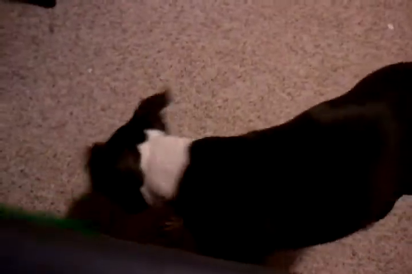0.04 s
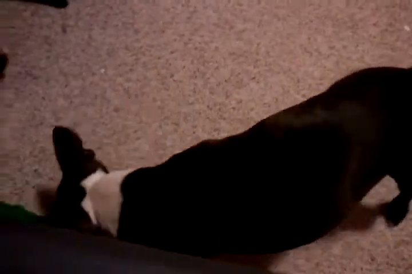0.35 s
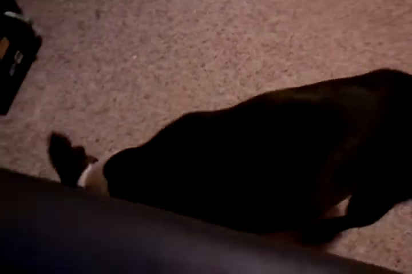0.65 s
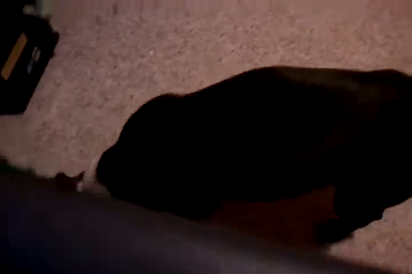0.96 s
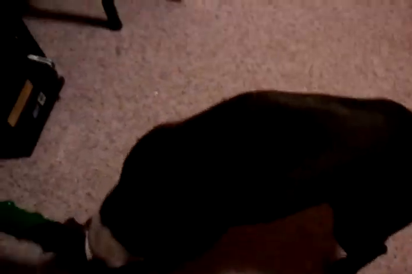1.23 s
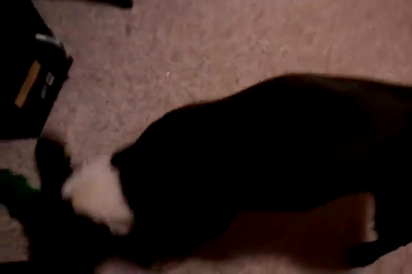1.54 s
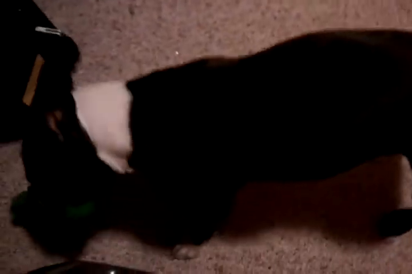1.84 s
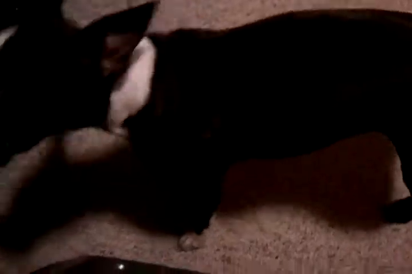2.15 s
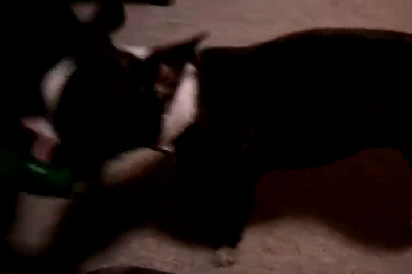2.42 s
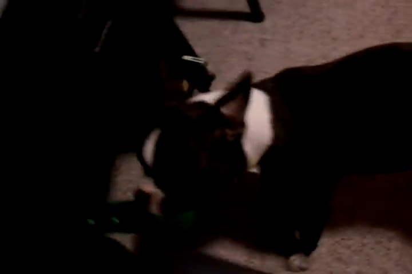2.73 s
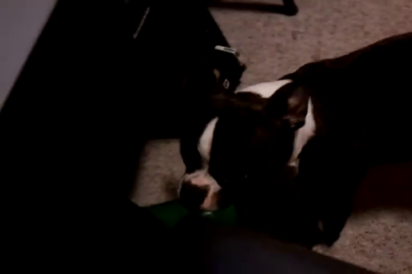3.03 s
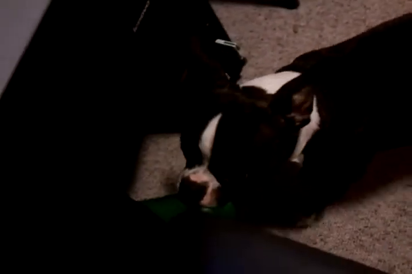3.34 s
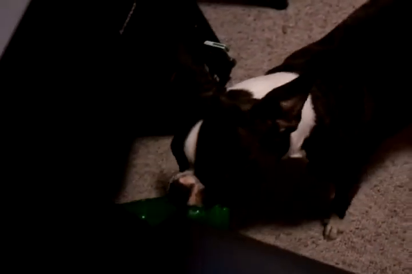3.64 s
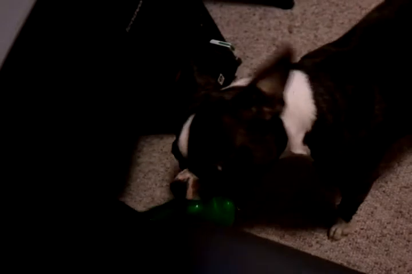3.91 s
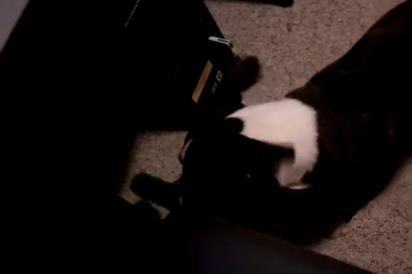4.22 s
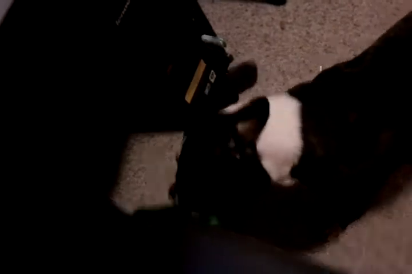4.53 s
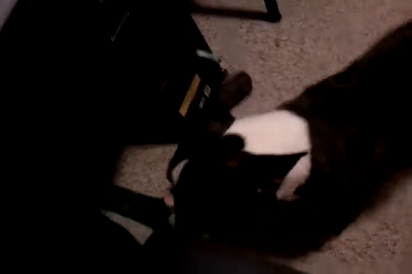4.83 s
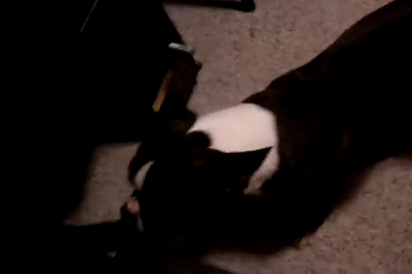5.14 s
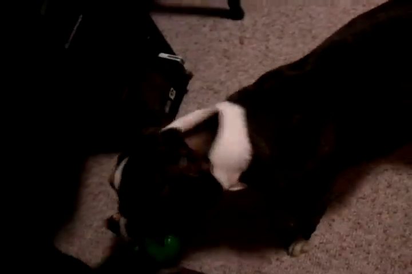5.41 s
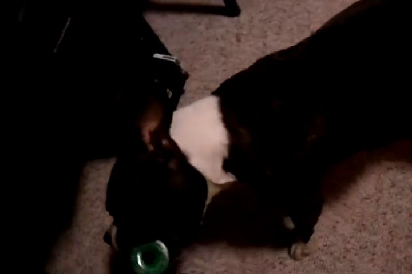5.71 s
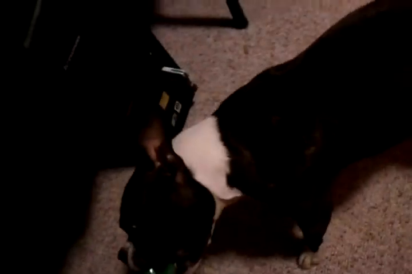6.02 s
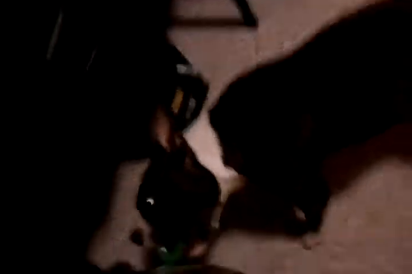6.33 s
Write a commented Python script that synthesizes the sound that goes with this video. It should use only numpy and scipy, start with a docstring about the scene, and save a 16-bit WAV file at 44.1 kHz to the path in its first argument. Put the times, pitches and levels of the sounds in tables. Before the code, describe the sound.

A puppy plays with a rubber squeaky toy on the carpet of a small room. It opens with a flurry of dull bumps and scuffs from paws and toy, followed by a few tiny tooth clicks and brushing fur. Five short, high squeaks come at uneven intervals, the first one fainter. A sharp tooth click and light shuffling finish it. Everything sounds close, over a faint steady hiss.

```python
"""A rubber squeaky toy sounds five times as a puppy bites it, on a carpet in a small room.
Each bite drives air through a reed, whose pitch rises and falls with the pressure.
Between bites, paws and toy bump and scuff on the floor and teeth tick on the rubber.
Fur brushes the furniture and air seeps out of the toy and back in, over a faint steady hiss."""
import sys
import numpy as np
from scipy import signal
from scipy.fft import rfft, irfft
from scipy.io import wavfile

SR = 44100
rng = np.random.default_rng(int(sys.argv[2]) if len(sys.argv) > 2 else 0)


def wav_record(signal):
    """Record a signal, one row per channel, as 16-bit PCM in the file named by sys.argv[1]."""
    frames = np.transpose(np.atleast_2d(signal))
    bounded = np.clip(frames, -1, 1)
    # unit amplitude maps onto the largest positive 16-bit level
    quanta = np.round(bounded * 32767).astype(np.int16)
    wavfile.write(sys.argv[1], SR, quanta)


N = 280689
T = np.arange(N) / SR

# paws and toy landing on the carpet: (time [s], level [dB], contact time [ms])
LANDINGS = [(0.023, -35, 0.31), (0.037, -17.5, 2.34), (0.072, -26.5, 2.9), (0.128, -24, 2.54),
            (0.391, -29.5, 1.23), (0.429, -16.5, 1.25), (0.444, -25.5, 1.8), (0.508, -32, 3.2),
            (0.521, -28, 0.56), (0.753, -40, 1.9), (0.777, -42.5, 0.7), (1.073, -40.5, 1.04),
            (1.645, -45, 4.8), (1.773, -43, 2.5), (1.918, -41, 2.9), (2.165, -44.5, 2.9), (3.204, -47, 3.6),
            (3.457, -45.5, 3.6), (3.826, -50.5, 1.8), (5.607, -43, 0.72), (5.632, -48, 0.28),
            (5.776, -45.5, 1.52), (5.921, -35, 2.7), (5.946, -40.5, 0.71)]


def squeaks(attack_s=0.0051, release_s=0.017, squeeze_db_per_hz=0.0336, full_tone_hz=1040):
    """Source and filter: a reed chops the airflow into harmonics that sweep through tube resonances."""
    # bites: (time [s], length [s], pitch [Hz], pitch lift at the hardest squeeze [Hz],
    # time to that squeeze [s], its half length [s], level [dB], fade [dB/s])
    bites = [(1.451, 0.072, 1129, 60, 0.0033, .018, -34, -28),
             (2.6695, 0.12, 1112, 66.2, 0.045, 0.049, -21.5, 9.5),
             (3.771, 0.16, 1125, 155, .0495, .036, -24.5, 8.5),
             (4.149, .125, 1105, 19.9, 0.0638, 0.013, -23.5, 25),
             (4.931, 0.067, 1057, 9.2, 0.013, 0.007, -22.5, 114)]
    # the reed as the jaws shade it, per bite: (level of each of harmonics 1 to 7 [dB])
    spectra = [(-5.5, 0.5, -0.5, -6.5, -1.5, -10.5, -31), (-12.5, -7.5, -11, -8.5, -1, -10, -36),
               (-7.5, -3, -7.5, -3.5, -0.5, -11, -28), (-9.5, -2.5, -7.5, -9, -2.5, -7.5, -22),
               (-14.5, -2.5, -7.5, -11, -14, -8, -21.5)]
    # two near reflections per bite: (delay [ms], gain [ratio], delay [ms], gain [ratio])
    reflections = [(1.04, 0.48, 4.95, 0.22), (2.81, 0.39, 2.0, 0.44), (1.08, 0.42, 3.1, 0.15),
                   (1.96, 0.5, 6.74, 0.13), (5.13, 0.13, 0.85, 0.49)]
    # unsteadiness of the reed, per bite: (pitch jitter [ratio], air level [dB])
    rasps = [(.011, -20), (0.00092, -25), (0.0025, -20), (0.0011, -22), (0.0014, -27)]
    # resonances of the reed's tube: (frequency [Hz], width [Hz], boost [dB])
    tube = [(2455, 140, 10), (4609, 35, 8), (4808, 135, 16)]
    # spectrum of the rushing air: (frequency [Hz], level [dB])
    air_colour = [(40, -34.5), (100, -23.5), (300, -12.5), (750, -1), (1500, -14), (2400, -7.5),
                  (3200, -10.5), (5200, -1.5), (6800, 3.5), (8000, -3.5)]
    start_flat_hz, start_s, sag_hz_per_s = 125, 0.0033, 144
    end_flat_hz, end_s, end_jitter = 190, 0.0139, 0.0209
    out = np.zeros(N)
    wobble, flutter_db = walk(700), 1.5 * walk(300)
    air = colour(rng.standard_normal(N), air_colour)
    for bite, harmonics, echoes, (jitter, air_db) in zip(bites, spectra, reflections, rasps):
        s, length, reed_hz, lift_hz, crest, half, db, fade = bite
        t = T[:int(length * SR)]
        span = int(s * SR) + np.arange(len(t))
        squeeze_hz = lift_hz * np.exp(-((t - crest) / half) ** 2)
        # the reed comes up to pitch, sags as the toy empties, then drops raggedly as the air runs out
        spent = np.exp((t - length) / end_s)
        flat_hz = start_flat_hz * np.exp(-t / start_s) + sag_hz_per_s * t + end_flat_hz * spent
        hz = (reed_hz + squeeze_hz - flat_hz) * (1 + (jitter + end_jitter * spent) * wobble[span])
        phase = 2 * np.pi * np.cumsum(hz) / SR
        dull_db = 50 * np.maximum(1 - hz / full_tone_hz, 0)  # a weakly blown reed loses its edge
        reed = undb(air_db) * air[span] * (1 + np.cos(phase))  # air hisses while the reed is open
        for k, harmonic_db in enumerate(harmonics, 1):
            tube_db = sum(boost / (1 + (2 * (k * hz - f) / width) ** 2) for f, width, boost in tube)
            reed += undb(harmonic_db + tube_db - dull_db * (k - 2)) * np.sin(k * phase)
        # loudness follows the squeeze until the jaws let go
        gate = np.minimum(np.minimum(t / attack_s, (length - t) / release_s), 1)
        reed *= gate * undb(db + squeeze_db_per_hz * squeeze_hz - fade * t + flutter_db[span])
        add(out, s, reed)
        for ms, gain in np.reshape(echoes, (-1, 2)):
            add(out, s + ms / 1000, gain * reed)
    return out


def peeps(jitter=0.024):
    """Near its threshold of oscillation the reed gives only a faint, unsteady fundamental."""
    # light squeezes: (peak time [s], pitch [Hz], level [dB], half length [s])
    squeezes = [(3.575, 790, -58.5, 0.016), (3.614, 1186, -58.5, 0.016), (5.947, 1123, -44.5, 0.0043),
                (6.199, 1130, -53, 0.0072)]
    out = np.zeros(N)
    wobble = 1 + jitter * walk(400)
    for s, hz, db, half in squeezes:
        envelope = undb(db) * np.exp(-((T - s) / half) ** 2)
        out += envelope * np.sin(2 * np.pi * np.cumsum(hz * wobble) / SR)
    return out


def bumps(landings, detune=0.041, lowest_hz=100):
    """Impact excitation: a soft push rings the floor's modes; longer contact gives a duller bump."""
    # modes of the floor: (frequency [Hz], level [dB], t60 [s])
    floor_modes = [(112, -24.5, 0.11), (229.6, -12, 0.068), (298, -4, 0.048), (370.5, -2, 0.04),
                   (479, -2.5, 0.05), (565, -2, 0.062), (671, 0, 0.051), (870, -9, 0.087), (1081, -4, 0.11),
                   (1830, 7, 0.028), (2040, -3, 0.018), (2500, -7, 0.056)]
    out, t = np.zeros(N), T[:SR // 5]
    hz, db, t60 = np.transpose(floor_modes)[:, :, None]
    places = rng.standard_normal((len(landings), 2, len(floor_modes), 1))
    for (s, peak_db, contact_ms), (shift, swing) in zip(landings, places):
        # the point of impact decides which way each mode swings
        modes = np.sign(swing) * np.sin(2 * np.pi * hz * (1 + detune * shift) * t)
        ring = (modes * undb(db) * decay(t, t60)).sum(0)
        push = np.hanning(int(contact_ms * SR / 1000))
        bump = band(signal.fftconvolve(ring, push), lowest_hz, "high")
        add(out, s, undb(peak_db) * bump / abs(bump).max())
    return out


def steps(per_s=24, contact_ms=3.5, spread_db=8.5):
    """An irregular impact train: light landings as the puppy shifts its feet."""
    # spells of shuffling: (start [s], end [s], level [dB])
    shuffles = [(0.058, .16, -37), (0.424, .56, -42), (3.033, 3.1, -53.5), (5.622, 5.8, -56),
                (5.939, 6.02, -46)]
    landings = []
    for start, end, db in shuffles:
        slots = np.arange(start, end, 1 / per_s)
        for s, (late, size) in zip(slots, rng.random((20, 2))):
            landings.append((s + late / per_s, db + spread_db * (2 * size - 1), contact_ms))
    return landings


def ticks(rise_s=0.00013, tube_hz=4850, tube_db=-21.5, tube_t60=0.013, lowest_hz=3200):
    """Damped free vibration: each slip of a tooth rings briefly and faintly excites the toy's tube."""
    # teeth slipping off wet rubber: (time [s], level [dB], frequency [Hz], t60 [ms])
    slips = [(1.1101, -23.5, 6200, 2.3), (1.1288, -21.5, 5450, 2.8), (1.1912, -27, 4600, 0.83),
             (2.3431, -33.5, 5130, 1.3), (4.6867, -39.5, 5680, 4.1), (5.1577, -11, 5700, 1.03),
             (5.1873, -34, 4970, 3.3), (5.2193, -37.5, 5600, 2), (5.8600, -38, 4620, 11)]
    out, t = np.zeros(N), T[:SR // 40]
    onset = 1 - np.exp(-(t / rise_s) ** 2)
    tube = undb(tube_db) * onset * decay(t, tube_t60) * np.sin(2 * np.pi * tube_hz * t)
    for s, db, hz, t60_ms in slips:
        envelope = onset * decay(t, t60_ms / 1000)
        ring = envelope / envelope.max() * np.sin(2 * np.pi * hz * t)
        add(out, s, undb(db) * (ring + tube))
    return band(out, lowest_hz, "high")


def scuffs(split_hz=3200, rise_share=0.72):
    """Friction noise: carpet fibres slip in short swells, during drags and under landings."""
    # toy or claw dragged over the pile: (peak time [s], level [dB], length [s], treble tilt [dB])
    drags = [(0.004, -27.5, .02, -6), (0.028, -17, 0.0093, 5.5), (0.126, -35.5, 0.0061, 3),
             (0.176, -54.5, 0.038, 16), (0.339, -45, 0.074, -24), (0.47, -45, 0.093, -33),
             (0.727, -45, 0.0028, 9), (0.873, -55, 0.019, 12), (3.095, -61.5, 0.036, 11),
             (3.217, -57, 0.011, 21.5), (3.273, -67, 0.076, 17.5), (3.792, -30.5, 0.0035, -7),
             (4.147, -43, 0.0043, -3.5), (4.928, -53, 0.012, -2), (5.222, -46, 0.003, 3),
             (5.612, -49, .007, 2), (5.638, -43.5, .006, -2), (5.676, -58, 0.035, 2),
             (5.864, -52, 0.0057, 13.5), (6.021, -65, 0.18, 13)]
    # spectrum of the slipping pile: (frequency [Hz], level [dB])
    pile_colour = [(25, -23.5), (60, -1.5), (115, -3), (160, -20.5), (215, -10.5), (550, 5.5), (850, 1),
                   (1150, -1.5), (1700, 1), (2700, -4.5), (3400, -13), (4600, -12), (5600, -7), (7000, -10),
                   (8200, -11.5), (11000, -51.5)]
    crush_db, soft_db_per_ms, crush_tilt_db, rise_s, fall_s = -11.5, 5, -27, 0.0017, 0.013
    grain = colour(fibres(spread_db=2.5), pile_colour)
    low, high = band(grain, split_hz, "low"), band(grain, split_hz, "high")
    # a landing crushes the pile, less so when it is soft
    low_power = sum(swell(s + rise_s, db + crush_db - soft_db_per_ms * contact_ms, rise_s, fall_s)
                    for s, db, contact_ms in LANDINGS)
    high_power = low_power * undb(crush_tilt_db) ** 2
    for s, db, length, tilt_db in drags:
        power = swell(s, db, rise_share * length, (1 - rise_share) * length)
        low_power += power
        high_power += power * undb(tilt_db) ** 2
    return low * np.sqrt(low_power) - high * np.sqrt(high_power)


def fur(uneven_db=0.9):
    """Sliding friction: fur brushes unevenly along the furniture."""
    # strokes of fur: (peak time [s], level [dB], rise [s], fall [s])
    strokes = [(.05, -47.5, .1, 0.21), (1.54, -44, 0.21, 0.14), (1.69, -44.5, 0.21, 0.12),
               (5.38, -62, .08, 0.31)]
    # spectrum of the brushing: (frequency [Hz], level [dB])
    fur_colour = [(88, -34.5), (150, -15.5), (297, -6.5), (407, -10.5), (481, -6.5), (920, -5.5),
                  (1520, -5), (2410, -2.5), (3050, -12.5), (5930, -14.5), (8000, -18), (10400, -55.5),
                  (17600, -120)]
    return colour(fibres(spread_db=1), fur_colour) * swells(strokes) * undb(-uneven_db * walk(43))


def leak():
    """Flow noise: air slips out through the reed too slowly to set it oscillating."""
    # escapes of air: (peak time [s], level [dB], rise [s], fall [s])
    escapes = [(.02, -53, .05, 0.13), (.42, -53, .15, 0.041), (.8, -54, 0.27, 0.2), (2.6, -56.5, 0.2, 0.4),
               (3.59, -59.5, 0.11, 0.23)]
    # spectrum of the escaping air: (frequency [Hz], level [dB])
    leak_colour = [(500, -30), (1500, -7.5), (2300, -3.5), (3000, -8.5), (3800, -7.5), (4600, -11),
                   (6000, -9.5), (8000, -17)]
    return colour(rng.standard_normal(N), leak_colour) * swells(escapes)


def vent(centre_hz=3630, width_hz=550):
    """Narrow-band flow noise: air is drawn back in through the toy's vent."""
    # intakes of air: (peak time [s], level [dB], rise [s], fall [s])
    intakes = [(.16, -54.5, .5, .3), (.43, -53, 0.18, 0.05), (.85, -63, .04, 0.044)]
    resonance = signal.iirpeak(centre_hz, centre_hz / width_hz, fs=SR)
    air = signal.lfilter(*resonance, rng.standard_normal(N))
    return air / air.std() * swells(intakes)


def room(x, wet_db, t60=0.22, gap_s=0.0017, build_s=0.003, early_db=4, early_s=0.015):
    """Reverberation: in a small carpeted room, reflections thicken after a short gap and die quickly."""
    # spectrum of the reflections: (frequency [Hz], level [dB])
    room_colour = [(100, -0.5), (160, -3), (400, 5), (1100, -5), (2300, -0.5), (3400, -4), (5500, -3.5),
                   (8000, -3.5), (12000, -19.5)]
    t = T[:SR // 2]
    build = np.clip((t - gap_s) / build_s, 0, 1)
    fade = decay(t, t60) * undb(early_db * np.exp(-t / early_s))
    tail = colour(rng.standard_normal(len(t)), room_colour) * fade * build
    return x + undb(wet_db) * signal.fftconvolve(x, tail / np.linalg.norm(tail))[:N]


def hiss(level_db=-60):
    """Stationary broadband noise: a faint, steady background."""
    # spectrum of the hiss: (frequency [Hz], level [dB])
    hiss_colour = [(15, -42.5), (25, -13.5), (48, -5.5), (83, -9), (108, -3.5), (301, -2.5), (384, -3),
                   (502, -3.5), (554, -4), (596, -4.5), (2120, -12), (6990, -12.5), (8500, -17),
                   (11000, -63), (18700, -120)]
    return undb(level_db) * colour(rng.standard_normal(N), hiss_colour)


def fibres(spread_db, snap_samples=16):
    """Amplitude-modulated noise: dense tiny snaps of uneven size, as from fibres slipping."""
    sizes = undb(spread_db * np.minimum(rng.exponential(size=N // snap_samples + 1), 4))
    return rng.standard_normal(N) * np.repeat(sizes, snap_samples)[:N]


def swell(s, db, rise, fall):
    """Power envelope with exponential growth to a peak at time s, then exponential decay."""
    time_constants = np.maximum((s - T) / rise, (T - s) / fall)
    return undb(db) ** 2 * np.exp(-2 * np.minimum(time_constants, 20))


def swells(rows):
    """Incoherent addition: overlapping swells sum in power, and the root is their gain."""
    return np.sqrt(sum(swell(*row) for row in rows))


def decay(t, t60):
    """Exponential damping by 60 dB in t60 seconds."""
    return np.exp(-np.log(1000) * t / t60)


def walk(per_s):
    """Random modulation: interpolated Gaussian points, with a spread near 1."""
    points = rng.standard_normal(N // 10)
    return np.interp(T * per_s, np.arange(len(points)), points)


def colour(x, points):
    """Spectral shaping by (frequency [Hz], level [dB]) points, scaled to rms 1."""
    hz, db = np.transpose(points)
    bin_hz = np.maximum(np.fft.rfftfreq(len(x), 1 / SR), 1)
    gain = undb(np.interp(np.log(bin_hz), np.log(hz), db))
    shaped = irfft(rfft(x) * gain, len(x))
    return shaped / shaped.std()


def band(x, hz, kind, order=2):
    """Maximally flat low-pass or high-pass filter."""
    return signal.sosfilt(signal.butter(order, hz, kind, fs=SR, output="sos"), x)


def add(track, s, sound):
    """Superpose a sound on a track from time s."""
    start = int(s * SR)
    track[start:start + len(sound)] += sound[:N - start]


def undb(db):
    """Decibels to amplitude ratio."""
    return 10 ** (np.asarray(db) / 20)


def scene():
    """Superposition: toy, floor and teeth with their reverberation, then fur, seeping air and hiss."""
    background = hiss()
    toy = room(squeaks() + peeps(), wet_db=-13.5, early_db=6, t60=0.31, gap_s=0.0042, build_s=0.007)
    teeth = room(ticks(), wet_db=-34.5)
    floor = room(scuffs() + bumps(LANDINGS + steps()), wet_db=-12.5)
    return (toy + floor + teeth + fur() + leak() + vent() + background)[None]


def record(dry, soft_hz=7700, top_hz=8500):
    """Band limiting: the treble rounds off, then stops."""
    return band(band(dry, soft_hz, "low", order=7), top_hz, "low", order=16)


dry = scene()
out = record(dry)
wav_record(out)
```